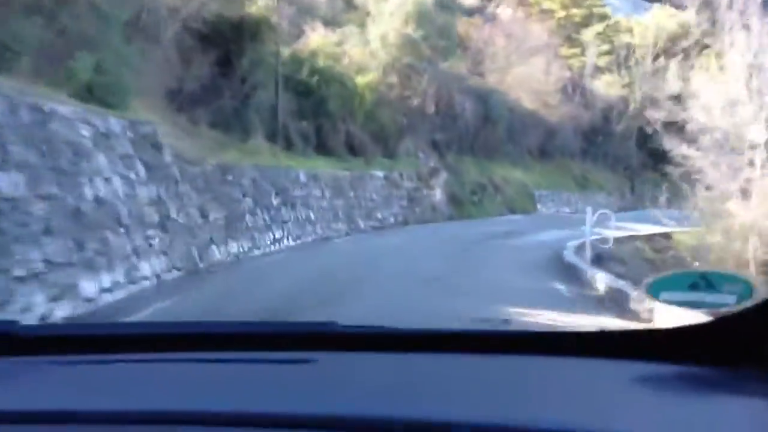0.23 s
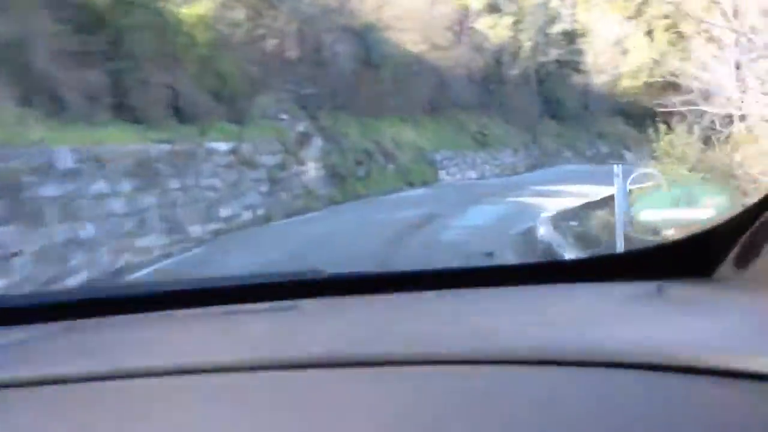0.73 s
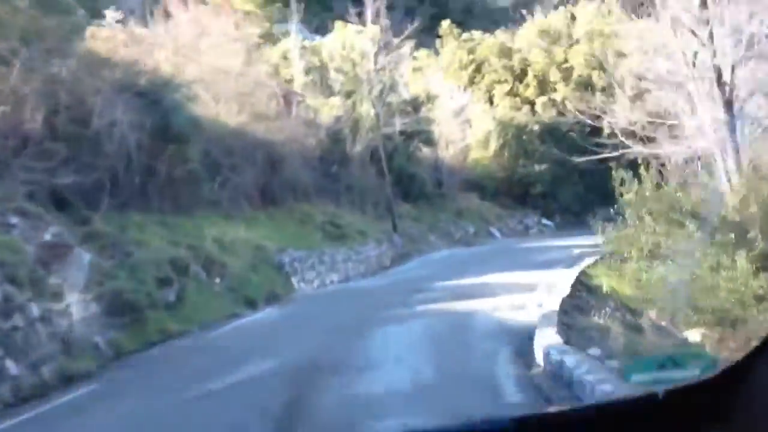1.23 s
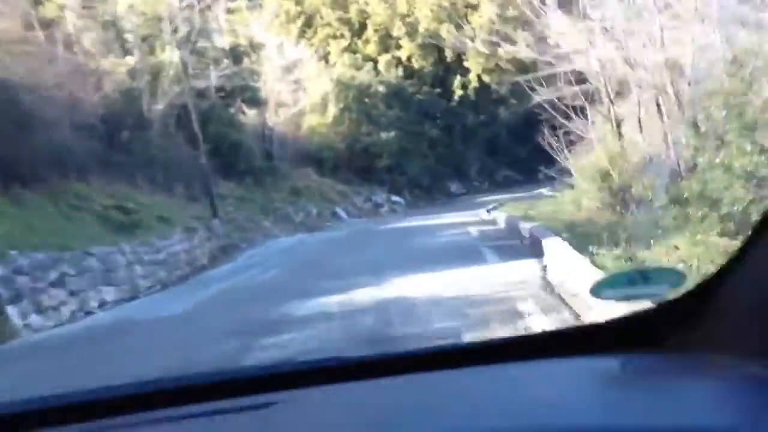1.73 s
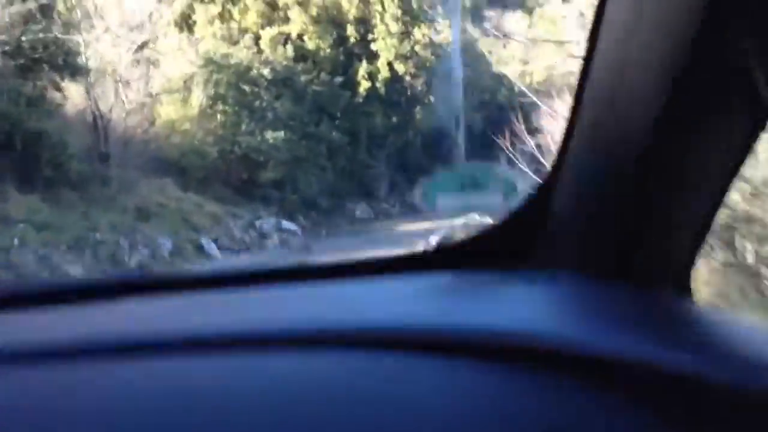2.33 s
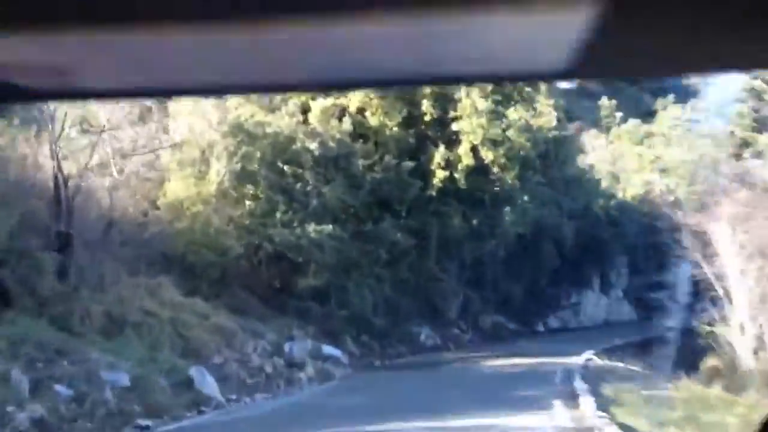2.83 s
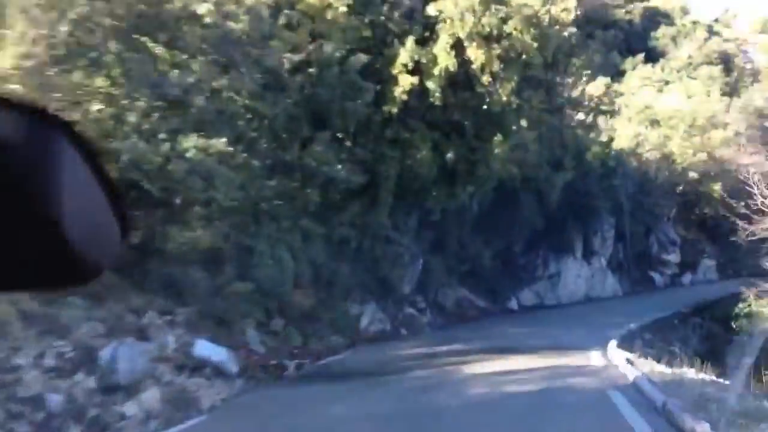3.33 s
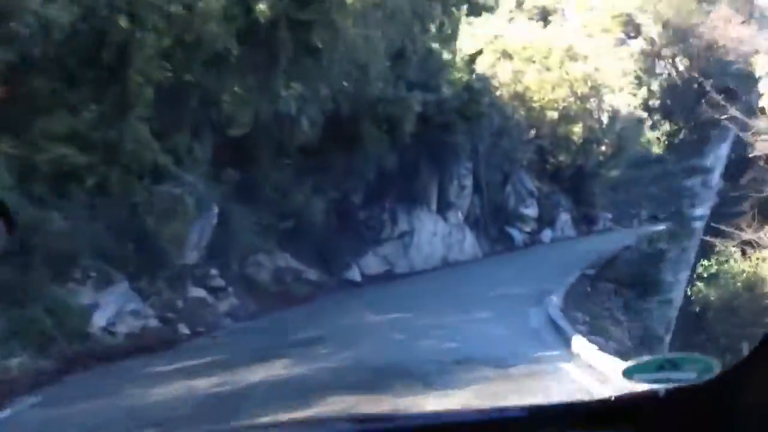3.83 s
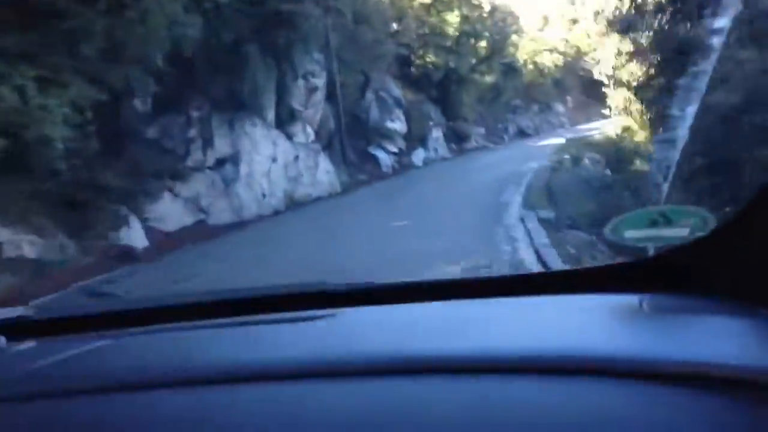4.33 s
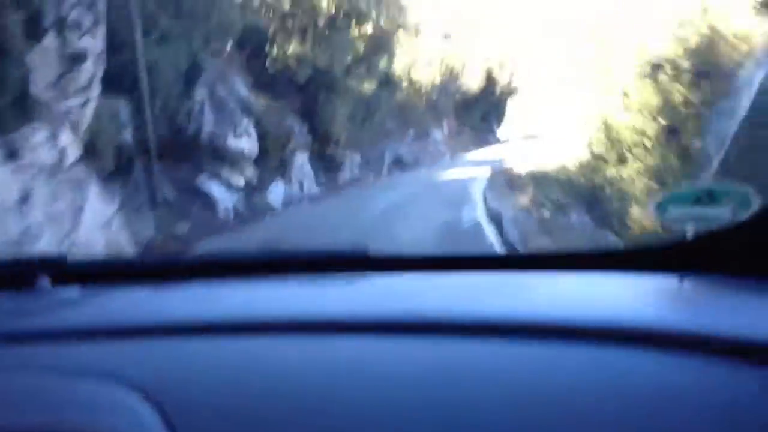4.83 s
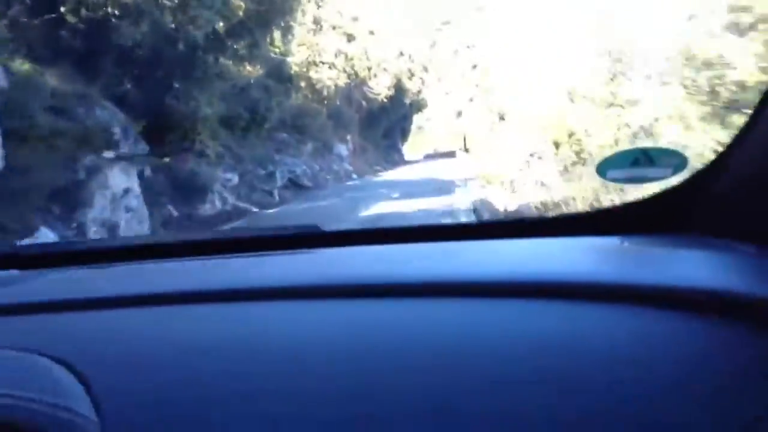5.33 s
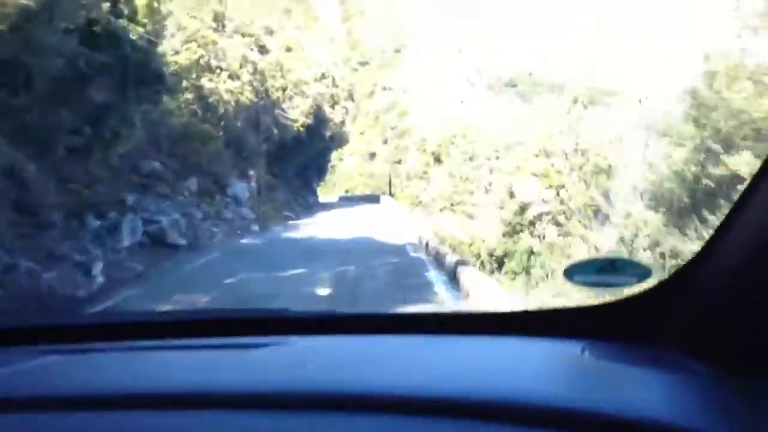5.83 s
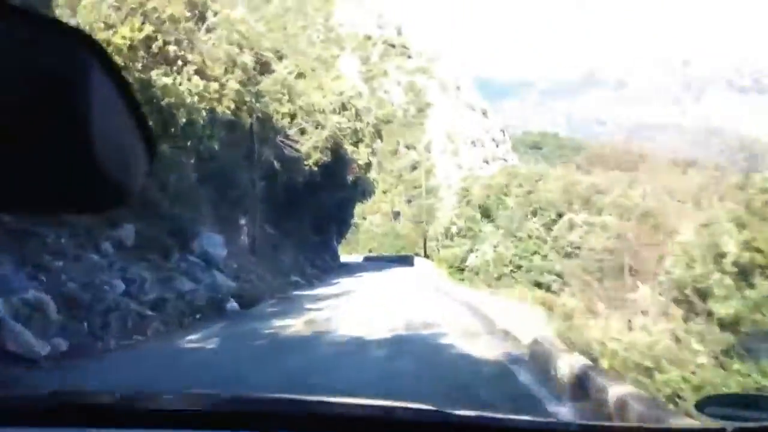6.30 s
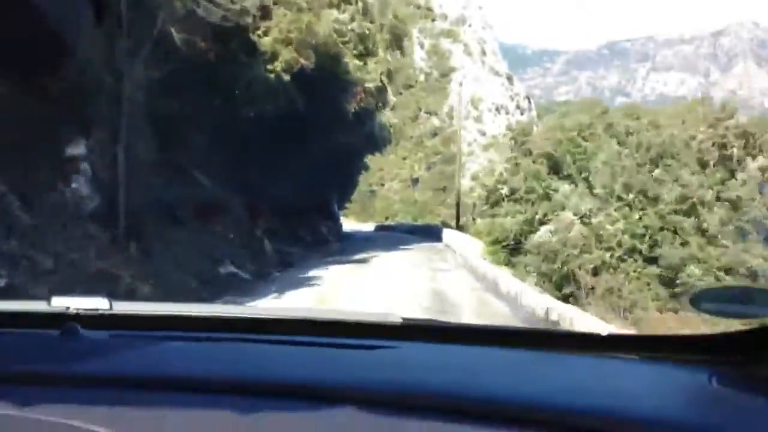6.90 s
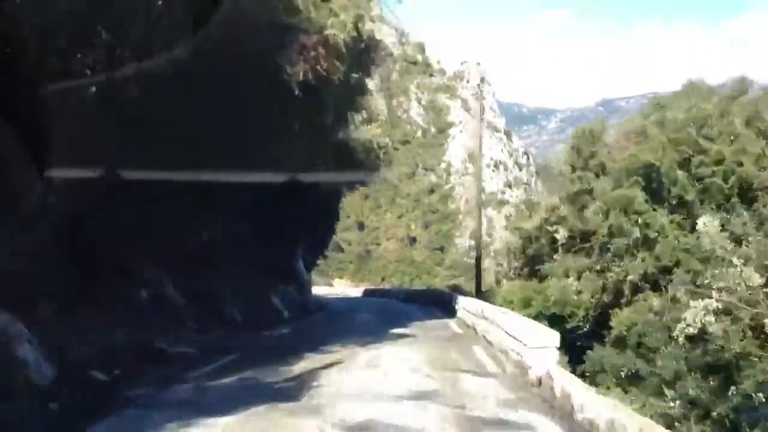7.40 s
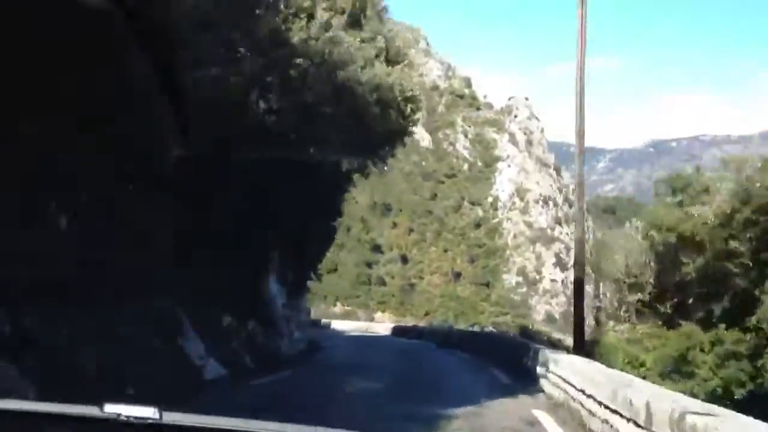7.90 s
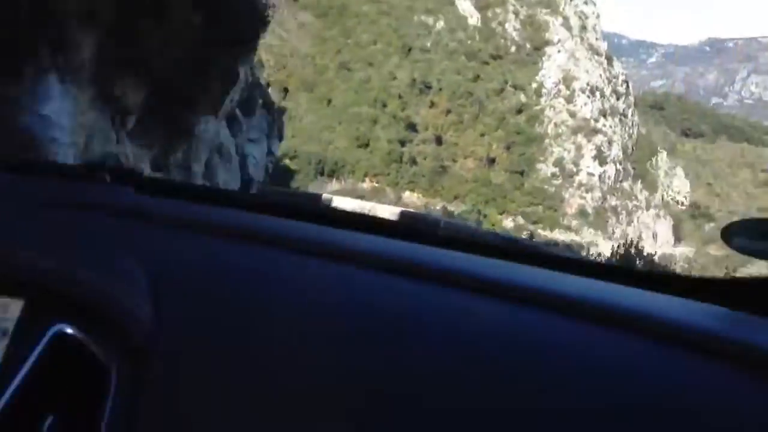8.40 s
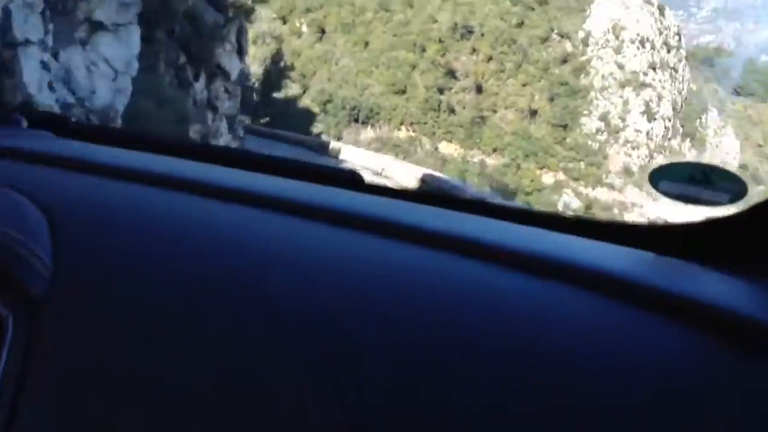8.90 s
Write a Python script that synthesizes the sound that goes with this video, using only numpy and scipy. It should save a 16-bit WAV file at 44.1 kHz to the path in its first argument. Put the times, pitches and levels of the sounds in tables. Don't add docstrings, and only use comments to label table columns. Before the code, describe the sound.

A small microphone inside a car hears a low, booming engine drone over floor rumble and tyre roar. The note dips slightly, climbs under throttle to a peak near seven seconds, then sinks back. Tyre hiss swells beside walls and rocks. Plastic trim ticks and slips, a joint squeaks faintly early on, and wheels thump over seams, hardest just past eight seconds. Little deep bass.

```python
import sys
import numpy as np
from scipy import signal
from scipy.fft import rfft, irfft
from scipy.io import wavfile
from scipy.ndimage import uniform_filter1d, map_coordinates

SR = 44100
rng = np.random.default_rng(int(sys.argv[2]) if len(sys.argv) > 2 else 0)


def dump_mix(stems):
    frames = np.atleast_2d(stems).T
    limited = np.clip(frames, -1, 1)
    pcm = np.round(limited * 32767).astype(np.int16)
    wavfile.write(sys.argv[1], SR, pcm)


def linear_from_db(decibels):
    return 10 ** (np.asarray(decibels, float) / 20)


N = 403515


def unit(x):
    return x / np.sqrt(np.mean(x ** 2) + 1e-20)


def curves(rows):
    s, *cols = np.transpose(rows)
    return [np.interp(np.arange(N) / SR, s, c) for c in cols]


def wobble(rate_hz):
    knots = rng.standard_normal(int(N * rate_hz / SR) + 4)
    return map_coordinates(knots, [np.arange(N) * rate_hz / SR])


def spans(rows, edge_s, fade_s):
    t = np.arange(N) / SR
    start, end, *cols = np.transpose(rows)
    rise = np.clip(0.5 + (t - start[:, None]) / (2 * edge_s), 0, 1)
    fade = np.exp(-np.maximum(t - end[:, None], 0) / fade_s)
    return np.array(cols) @ (rise * fade)


def bells(rows):
    t = np.arange(N) / SR
    return sum(db * np.exp(-((t - s) / half_s) ** 2) for s, db, half_s in rows)


def rush(spectrum, patchy_db):
    z = signal.stft(rng.standard_normal(N + 512), nperseg=512)[2]
    field = uniform_filter1d(rng.standard_normal(z.shape), size=6, axis=0)
    field = uniform_filter1d(field, size=14, axis=1)
    noise = signal.istft(z * linear_from_db(patchy_db * unit(field)), nperseg=512)[1][:N]
    hz, db = np.transpose(spectrum)
    grid_hz = np.fft.rfftfreq(N, 1 / SR)
    gain_db = np.interp(np.log(grid_hz + 1), np.log(hz + 1), db, -120, -120)
    return unit(irfft(rfft(noise) * linear_from_db(gain_db), N))


# (centre [Hz], width [Hz], lift [dB])
CABIN = [(283, 11, 14), (351, 40, 12.5), (391, 25, 12.5), (445, 22, 5.5), (547, 34, 15)]


def cabin_db(hz):
    power = sum(linear_from_db(2 * db) / (1 + (2 * (hz - centre) / width) ** 4) for centre, width, db in CABIN)
    return 10 * np.log10(1 + power)


# (time [s], firing rate [Hz], boom level [dB])
REVS = [(0, 143.1, -24.5), (.5, 143.4, -24), (1.0, 138.5, -30.5), (1.55, 135.3, -29), (2.5, 139, -31),
        (2.75, 144, -29.5), (3.55, 149.5, -23.5), (4.2, 153.5, -21), (4.5, 150.5, -22), (4.72, 155.7, -20),
        (5.05, 156.7, -20), (6.05, 176.4, -21), (6.65, 189.9, -27), (7.05, 193.4, -24.5),
        (7.62, 182.5, -24), (7.8, 172.4, -22.5), (8.42, 158.9, -19.5), (9.15, 151.3, -21.5)]
# (from [s], to [s], second harmonic over coasting [dB], third harmonic over coasting [dB])
PULLS = [
    (.7, 1.3, 8, 8),
    (2.58, 2.95, 11.5, 11),
    (3.1, 4.6, 4.12, 8),
    (5.1, 5.95, 6.96, 8.5),
    (6.0, 6.72, 12, 14),
    (6.76, 7.66, 13, -2),
    (8.3, 8.7, 5, -5),
]
# (time [s], loss [dB], negative lifts it, half length [s])
BOOM_DIPS = [(.68, 6.5, .04), (.86, 4, .05), (1.12, 5, 0.041), (1.37, 15, 0.037), (1.558, 3, .01),
             (1.75, 8, 0.05), (1.88, 13, 0.024), (2.33, 24, .025), (2.52, 5, 0.047), (3.09, 6, .03),
             (3.29, 6, 0.034), (3.4, 4, .03), (4.02, 3, 0.1), (4.56, 5, .03), (5.4, 4, .04), (5.59, 8.5, .045),
             (5.84, 5, 0.047), (6.1, -1, .03), (6.36, 4, .06), (6.52, 10, 0.041), (7.17, 1, 0.051),
             (7.37, 7, 0.16), (7.54, 10, 0.047), (7.92, 4, .04), (8.13, 3, 0.054), (8.268, 16, .01),
             (8.56, 2, 0.071), (8.8, -2.5, .06), (9.02, 1, 0.051)]
# (multiple of firing rate, level [dB])
UNEVEN = [(.25, -64.5), (.5, -63), (.75, -47), (1.25, -49), (1.5, -50), (1.75, -45.5), (2.25, -45.5),
          (2.5, -45), (2.75, -45.5), (3.25, -54), (3.5, -51), (3.75, -50.5), (4, -49.5), (4.25, -52),
          (4.5, -49.5), (4.75, -51)]


def engine():
    firing_hz, boom_db = curves(REVS)
    second_pull_db, third_pull_db = spans(PULLS, edge_s=0.06, fade_s=0.06)
    coast_db = -65.5
    second_db = coast_db + second_pull_db + cabin_db(2 * firing_hz)
    third_db = coast_db + third_pull_db + cabin_db(3 * firing_hz)
    uneven_db = -10 + 0.65 * third_pull_db
    phase = 2 * np.pi * np.cumsum(firing_hz) / SR + 0.058 * wobble(12)

    def line(order, db, waver_db):
        level = np.sqrt(2) * linear_from_db(db + waver_db * wobble(6))
        return level * np.sin(order * phase + rng.uniform(0, 2 * np.pi))

    tone = line(1, boom_db + 0.29 - bells(BOOM_DIPS), waver_db=0.34)
    tone += line(2, second_db, waver_db=3)
    tone += line(3, third_db, waver_db=1.5)
    return tone + sum(line(order, db + uneven_db, waver_db=3) for order, db in UNEVEN)


# (time [s], peak level [dB], ring [Hz])
SEAMS = [
    (1.444, -16.5, 283),
    (1.552, -17, 290),
    (2.153, -25, 291.5),
    (2.889, -52, 284),
    (5.478, -18, 289.3),
    (6.09, -16.5, 291),
    (6.786, -25, 288.8),
    (8.256, -10, 284),
]
# (time [s], tread roar level [dB])
ROAD = [(0, -35.5), (1, -38), (1.8, -39), (2.15, -40), (2.7, -39), (3.7, -38), (4.6, -36.5), (5.17, -36),
        (5.45, -32.5), (5.8, -34), (6.4, -32.5), (6.95, -34.5), (7.1, -36), (7.85, -36), (8.2, -34.5),
        (8.55, -37), (9.15, -33)]
# (from [s], to [s], hiss gain [dB], extra gain of brightest hiss [dB])
WALLS = [(0, .2, 0.5, 2), (.26, .84, 7, -1.5), (2.02, 2.3, 2.5, 1), (4.08, 4.42, 10, 1),
         (4.55, 5.2, 1.5, 1), (5.25, 6.85, 3.5, 2), (5.27, 5.62, 0, 1), (6.05, 6.45, 0.5, 0.5),
         (7.05, 7.48, 2, -0.5), (7.68, 7.78, 1.5, 1), (8.05, 8.7, 2, 0.5), (8.85, 9.2, 1.5, -1)]
# (time [s], extra shake [dB], half length [s])
HUMPS = [(0, 7, 0.049), (.66, 5, .08), (1.35, 9, .08), (1.82, -11, 0.099), (2.65, -6, .25), (3.26, 4, .15),
         (3.72, -5, .12), (4.35, 6, .15), (4.72, 5, .1), (5.45, 5.5, .15), (6.35, 5, .15), (7.06, 12, .08),
         (8.0, 8, 0.056), (8.26, 15, .04), (8.62, 6, .12)]
# (frequency [Hz], density [dB per Hz])
SHAKE = [(20, -35.5), (30, -25), (42, -13.5), (60, -15.5), (80, -6), (100, -1), (125, 1.5), (160, -28.5)]
# (frequency [Hz], density [dB per Hz])
BODY = [(70, -30), (100, -21.5), (125, 2.5), (170, 7), (210, -1), (300, -3), (420, -7.5), (600, -17.5),
        (1000, -33)]
# (frequency [Hz], density [dB per Hz])
TYRES = [(250, -25.5), (420, -5.5), (600, -1.5), (950, -1.5), (1300, -5.5), (1750, -7.5), (2200, -11),
         (2550, -17.5), (2900, -17.5), (3250, -15.5), (3700, -20.5), (5000, -24), (8000, -60)]
# (frequency [Hz], density [dB per Hz])
HISS = [(1500, -27), (2600, 2), (3500, 0.5), (4500, 1.5), (6000, 0.5), (7500, -3), (8600, -10), (9800, -25),
        (12000, -48)]
# (frequency [Hz], density [dB per Hz])
AIR = [(6000, -34), (8500, -2), (9900, -6.5), (11500, -5), (13400, -5), (14500, -8), (15300, -7.5),
       (16000, -6)]


def road():
    roar_db, = curves(ROAD)
    wall_db, bright_db = spans(WALLS, edge_s=0.03, fade_s=0.14)
    firing_hz = curves(REVS)[0]
    heave_db = bells([(s, 0.34 * (db + 27), 0.1) for s, db, _ in SEAMS])

    shake_db = -47.7 + 1.5 * wobble(5) + bells(HUMPS)
    rumble_db = -33 + 5 * np.log2(firing_hz / 155) + heave_db + 0.83 * wobble(6.3)
    flutter = wobble(12)
    hiss_db = roar_db - 15.5 + wall_db + 0.3 * flutter
    air_db = -67.5 + 0.7 * (roar_db - roar_db.mean()) + wall_db + bright_db + 0.7 * flutter

    shake = linear_from_db(shake_db) * rush(SHAKE, patchy_db=0)
    rumble = linear_from_db(rumble_db) * rush(BODY, patchy_db=1.5)
    roar = linear_from_db(roar_db + 1) * rush(TYRES, patchy_db=0.92)
    hiss = linear_from_db(hiss_db) * rush(HISS, patchy_db=0.8)
    air = linear_from_db(air_db) * rush(AIR, patchy_db=1)
    return shake + rumble + roar + hiss + air


def seams():
    out, t = np.zeros(N + SR), np.arange(SR // 8) / SR
    swell = t / 0.0046 * np.exp(1 - t / 0.0062)
    for s, db, hz in SEAMS:
        modes = [(hz, 1), (1.6 * hz, 0.32), (950, 0.35), (0.72 * hz, 0.65)]  # (Hz, gain)
        ring = sum(gain * np.sin(2 * np.pi * mode_hz * t) for mode_hz, gain in modes)
        out[round(s * SR):][:len(t)] += linear_from_db(db - 13.5) * swell * ring
    return out[:N]


# (centre [Hz], width [Hz])
PANELS = [
    (720, 45),
    (945, 63),
]
# (from [s], to [s], hum gain [dB])
COARSE = [
    (3.5, 6.5, 5.5),
    (6.8, 7.9, -10),
    (8.04, 8.36, 12),
    (8.42, 9.2, 8),
]


def panels():
    def ring(hz, width):
        skirts = [(hz - 3 * width, -30), (hz - width / 2, 0), (hz + width / 2, 0), (hz + 3 * width, -30)]
        return rush(skirts, patchy_db=0)

    hum_db = -55.5 + spans(COARSE, edge_s=0.06, fade_s=0.06)[0]
    return linear_from_db(hum_db) * sum(ring(hz, width) for hz, width in PANELS)


# (time [s], peak level [dB], top band re peak [dB], length [s])
TICKS = [
    (0.1, -39, -19, 0.0015),
    (2.2394, -39, -21, 0.0016),
    (2.377, -42, -20.5, 0.0015),
    (2.982, -40, -20, 0.0018),
    (3.201, -36, -29, 0.0018),
    (3.3533, -43, -29, 0.0015),
    (3.8754, -37, -21, 0.0016),
    (6.578, -31, -28, 0.0015),
    (7.849, -48, -12, 0.0015),
    (8.6194, -40.5, -20, 0.0016),
]
# (time [s], peak level [dB], top band re peak [dB], length [s])
SLIPS = [(0.376, -33.5, -20, 0.013), (0.4618, -35, -20, 0.0097), (0.7529, -32, -26, 0.011),
         (0.821, -33, -24, 0.012), (0.992, -40, -25, 0.009), (3.048, -31.5, -19, 0.015),
         (3.142, -39, -12.5, 0.009), (3.4825, -40, -24, 0.011), (4, -35.5, -13, 0.0098),
         (4.556, -34.5, -24, 0.009), (5.287, -35, -6, 0.009), (6.403, -32.5, -19.5, 0.011),
         (6.477, -37, -17, 0.011), (6.8314, -39, -14, 0.009), (7.275, -37, -19, 0.009),
         (7.7294, -37, -23, 0.009), (8.08, -32, -20.5, 0.013), (8.766, -38, -16, 0.009)]
# (time [s], level [dB], pitch [Hz], length [s])
SQUEAKS = [
    (.915, -75.5, 7900, .035),
    (1.085, -58, 7930, .04),
    (1.21, -59, 7950, .042),
]


def trim():
    out, t = np.zeros(N + SR), np.arange(2048) / SR
    grid_hz = np.fft.rfftfreq(len(t), 1 / SR)

    def band(noise, hz, width_hz):
        return unit(irfft(rfft(noise) * np.exp(-((grid_hz - hz) / width_hz) ** 2)))

    for s, db, top_db, length_s in [*TICKS, *SLIPS]:
        noise = rng.standard_normal(len(t))
        burst = band(noise, hz=5700, width_hz=2630)
        burst += linear_from_db(top_db + 4) * band(noise, hz=12500, width_hz=3000)
        decay = 1 / (1 + (t / length_s) ** 3)
        level = 2 * linear_from_db(db - 17.5) * np.sqrt(0.012 / length_s)
        out[round(s * SR):][:len(t)] += level * burst * decay
    for s, db, hz, length_s in SQUEAKS:
        swell = np.sin(np.pi * np.clip(t / length_s, 0, 1)) ** 0.5
        out[round(s * SR):][:len(t)] += linear_from_db(db - 2) * swell * np.sin(2 * np.pi * hz * t)
    return out[:N]


def scene():
    return (engine() + road() + seams() + panels() + trim())[None]


def top_cut(x):
    return signal.sosfilt(signal.butter(12, 15330, fs=SR, output="sos"), x)


def record(dry):
    return top_cut(dry)


dry = scene()
out = record(dry)
dump_mix(out)
```